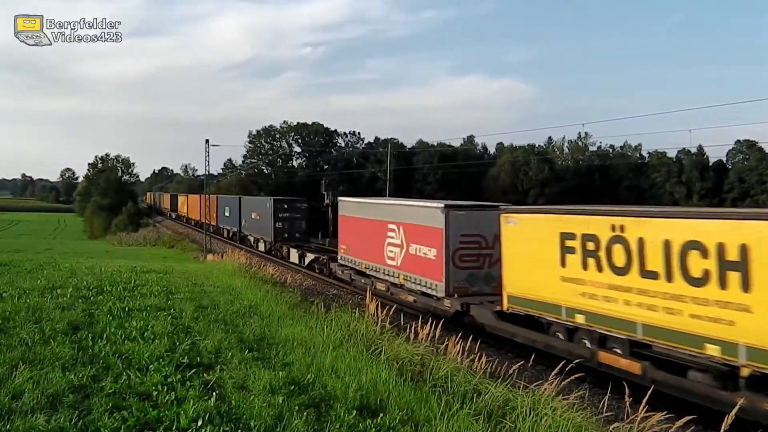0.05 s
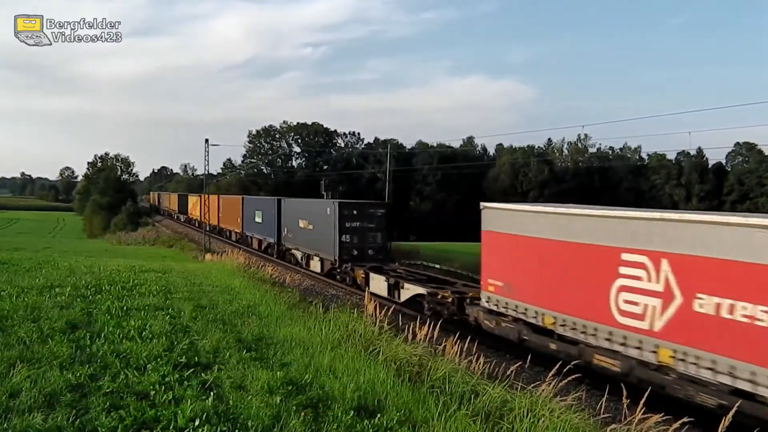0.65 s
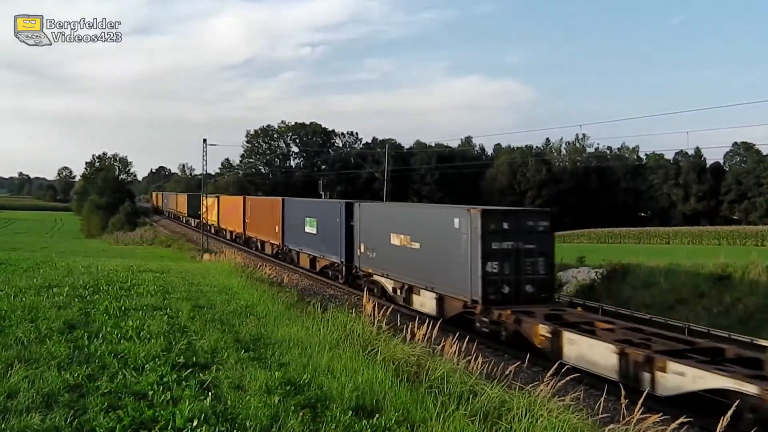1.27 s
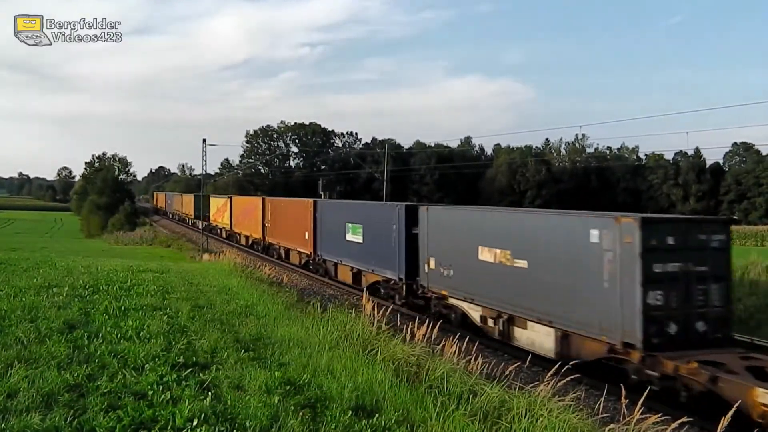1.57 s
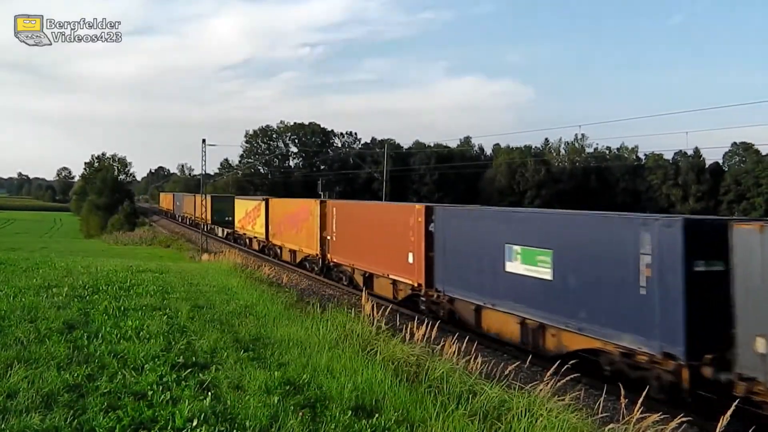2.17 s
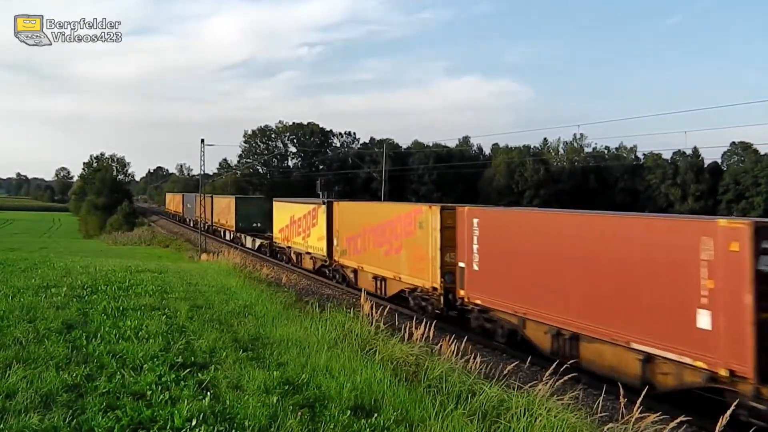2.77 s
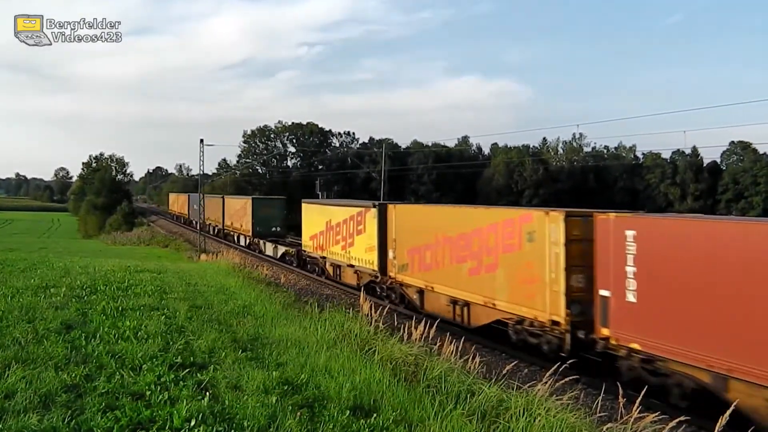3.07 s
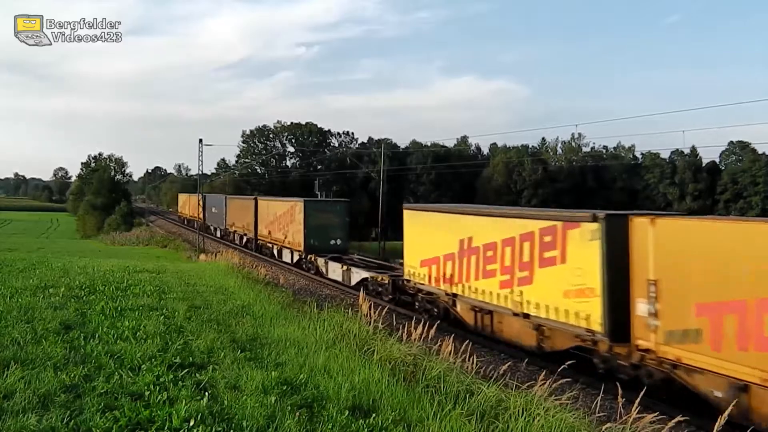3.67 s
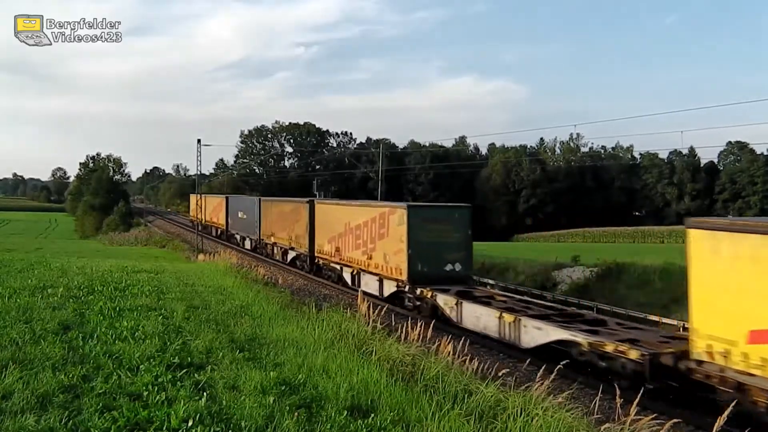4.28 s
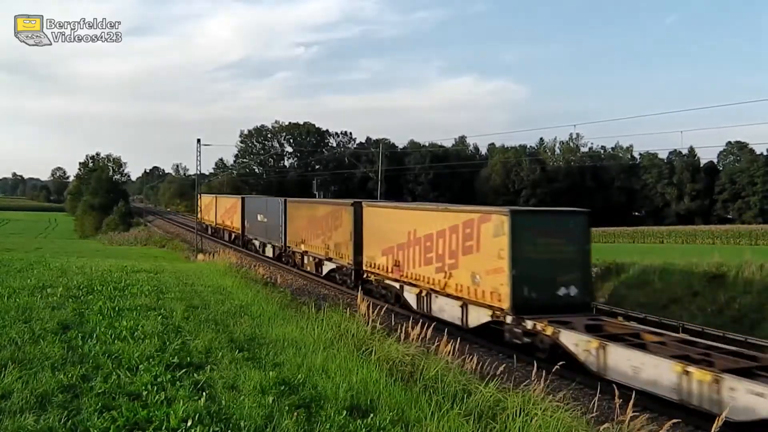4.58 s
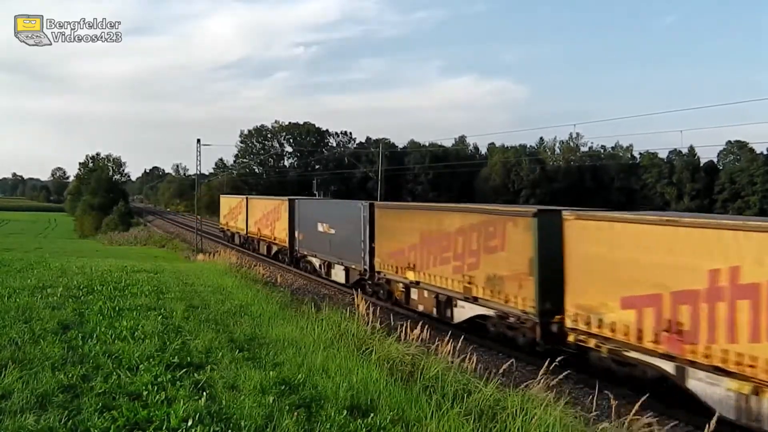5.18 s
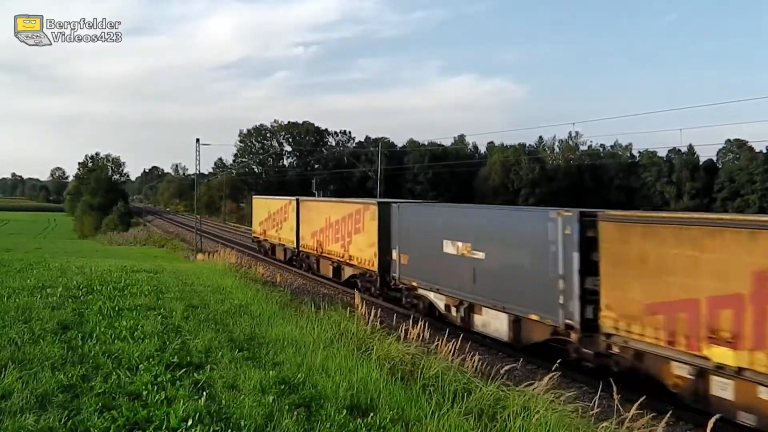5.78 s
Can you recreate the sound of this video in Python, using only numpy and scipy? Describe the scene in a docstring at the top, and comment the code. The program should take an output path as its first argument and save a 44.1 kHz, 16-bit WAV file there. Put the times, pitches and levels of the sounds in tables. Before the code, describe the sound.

A container freight train passes close at speed, its loud, throbbing roar mixed with ringing wheels, steel hiss and rattles.

```python
"""Open fields, trackside: a container train passes at speed, close to a stereo microphone pair.
Rough treads shake the rails into a roar that throbs and knocks. Two kinds of wheel ring in turn,
sinking in pitch as they go by. Above: steel-on-steel hiss, rattling fittings, two flange squeaks.
Below: thumping wagon frames, droning bodies and the rumble of bouncing axles."""
import sys
import numpy as np
from scipy import signal
from scipy.fft import rfft, irfft, next_fast_len
from scipy.io import wavfile
from scipy.ndimage import uniform_filter1d, minimum_filter1d

SR = 44100
rng = np.random.default_rng(int(sys.argv[2]) if len(sys.argv) > 2 else 0)


def inscribe(sig):
    """Save sig as 16-bit PCM at rate SR to the path in sys.argv[1].

    A 1-D sig is mono; a 2-D sig holds one channel per row.
    Samples are clipped to [-1, 1] before scaling.
    """
    pcm = np.round(np.clip(np.atleast_2d(sig).T, -1, 1) * 32767)
    wavfile.write(sys.argv[1], SR, pcm.astype(np.int16))


N = 261954
TIME = np.arange(N) / SR
HZ = np.fft.rfftfreq(N, 1 / SR)

# layer spectra: freq_hz, relative_density_db
ROAR_SPECTRUM = [(150, -44), (330, -16), (460, -6.5), (620, 0.0), (800, -0.0), (1050, 0.1), (1300, -0.2),
                 (1550, -0.7), (1800, -3.3), (2200, -9.5), (3000, -26), (6000, -55)]
RASP_SPECTRUM = [(900, -30), (1700, 1), (2050, 2.5), (2480, 2), (2800, -0.5), (3350, -2), (3900, -10.5),
                 (6000, -35)]
HISS_SPECTRUM = [(2000, -20.5), (3400, -0.5), (4200, 0.5), (4750, -0.5), (5600, 0.5), (6800, 2),
                 (7400, -7.5), (8400, -9.5), (9300, -17), (11000, -50.5)]
SIZZLE_SPECTRUM = [(7000, -19), (9200, -5.5), (10200, 1.5), (11000, 0), (12500, -10.5), (14000, -19),
                   (15500, -32)]
RUMBLE_SPECTRUM = [(8, -36), (20, -14), (35, -16), (45, -9.5), (60, -17), (90, -12.5), (200, -56)]
DRONE_SPECTRUM = [(50, -31), (85, -2.5), (115, 2.5), (180, 2), (260, -0.5), (370, -1.5), (600, -12.5),
                  (1500, -54)]
# rolling noise, before trim: time_s, level_db
ROAR_LEVELS = [(0.0, -23), (0.35, -24.5), (1.0, -23), (1.75, -20.5), (3.5, -21), (4.6, -20.5), (5.2, -23.5),
               (5.94, -21.5)]
RASP_LEVELS = [(0.0, -25.5), (0.3, -24.5), (1.05, -20.5), (1.8, -24), (3.4, -24), (4.0, -29), (4.45, -27.5),
               (4.8, -25.5), (5.55, -22), (5.94, -26.5)]
# bogie throb: centre_s, half_length_s, beat_hz, depth_db
BOGIE_THROBS = [(1.279, .3, 10.3, 1.05), (3.569, .45, 9.3, .75), (3.85, .6, 5.7, .65),
                (4.796, .45, 4.0, 1.05), (5.0, .6, 9.7, .75)]
# wheel knocks on the rail: centre_s, change_db
RAIL_KNOCKS = [(.689, 4), (.824, 3.5), (1.093, 2.5), (1.376, -1), (4.257, 2.5), (4.395, 0.5), (4.802, 2),
               (4.87, 5), (5.007, -0.2)]
# brief level dips: centre_s, change_db
LEVEL_DIPS = [(.716, -3.5), (2.343, -2), (4.46, -2.5), (4.644, -1.5), (5.139, -1.5)]
# modes of the two wheel kinds: pitch_hz, width_hz, level_db
LOW_WHEEL_MODES = [(658, 250, -27), (971, 134, -21.5), (1397, 116, -21.5), (1757, 87, -26.5),
                   (2153, 170, -24.5), (3540, 260, -32)]
HIGH_WHEEL_MODES = [(920, 330, -23), (1214, 175, -17.7), (1708, 210, -22), (2360, 250, -27.5),
                    (3320, 310, -31), (4120, 130, -35.5)]
# passing wheel sets: centre_s, half_length_s, kind, pitch_ratio, gain_db
WHEEL_PASSES = [(0.453, 0.81, "low", 0.99, 0.5), (1.13, 0.43, "low", .99, 0.2),
                (1.856, 0.67, "low", 0.96, -0.5), (2.843, 0.89, "high", 1.04, 0),
                (3.837, 0.56, "high", 1.004, 0.1), (4.575, 0.7, "high", 0.968, -2),
                (5.645, 0.65, "low", .985, 0)]
# single wheel modes singing out: centre_s, half_length_s, pitch_hz, level_db
WHEEL_PINGS = [(.52, 0.46, 942, -21), (2.17, .18, 2480, -26.5), (4.594, 0.22, 1760, -31),
               (4.785, 0.053, 2390, -25), (5.063, .14, 1640, -20), (5.146, 0.29, 1043, -22),
               (5.55, 0.43, 2032, -23.5), (5.624, 0.56, 1304, -22.5), (5.78, .35, 2216, -20.5)]
# contact treble, before trim: time_s, hiss_db, sizzle_db
CONTACT_LEVELS = [(0.0, -22, -33.0), (0.7, -21.5, -32.5), (1.36, -20.0, -34), (1.45, -22.0, -35.0),
                  (1.8, -24.5, -39.5), (2.4, -23.0, -34.5), (3.4, -22, -36.5), (3.97, -25.5, -41),
                  (4.45, -25, -39.0), (4.77, -22.5, -35.5), (4.92, -24.0, -35.5), (5.5, -19.0, -33.0),
                  (5.94, -19, -35)]
# loose fittings, before trim: centre_s, level_db
FITTING_RATTLES = [(.996, -22.5), (1.1, -19), (1.368, -19.5), (1.575, -20), (2.541, -20.5), (2.736, -20),
                   (3.688, -20), (4.784, -27), (5.41, -21.5)]
# flange squeaks: centre_s, half_length_s, pitch_hz, level_db
FLANGE_SQUEAKS = [(4.655, .04, 5480, -25), (5.04, .04, 5100, -25.5)]
# wagon frame thumps: peak_s, peak_db, pitch_hz
FRAME_THUMPS = [(.527, -13.5, 171), (.618, -14.5, 168), (1.349, -15, 247), (1.596, -16, 179),
                (1.791, -18, 168), (2.059, -18, 224), (2.615, -19.5, 190), (4.566, -21, 95),
                (5.014, -20.5, 112)]
# booming wagon bodies: centre_s, half_length_s, pitch_hz, width_hz, level_db
BODY_BOOMS = [(0.75, 0.97, 187, 55, -31.5), (1.3, 0.65, 611, 164, -22.5), (5.14, 0.95, 109, 39, -32.5),
              (5.85, 0.21, 710, 200, -22)]
# track load, before trim: time_s, rumble_db, drone_db
LOAD_LEVELS = [(0.0, -26, -25), (0.6, -27.5, -23.5), (1.1, -29, -26.0), (1.28, -39, -27),
               (2.05, -43, -25.5), (2.45, -46, -29), (2.8, -35, -27), (4.15, -39.5, -27.5),
               (4.55, -32, -24.5), (5.55, -31.5, -27.5), (5.94, -36, -28.5)]
# microphone balance: freq_hz, left_minus_right_db
MIC_BALANCE = [(50, 1), (300, 0.4), (1200, -1), (2000, -1.5), (3100, -.7), (4800, -5.5), (6700, -8.5),
               (8600, -7), (10200, -1.5), (12000, -4.5), (15000, -1.5)]
# microphone phase: freq_hz, left_lead_rad
MIC_PHASE = [(100, -.11), (900, -.2), (1450, -.34), (1900, -.22), (2800, -.22), (4100, -.9), (5700, -.85),
             (6200, -1.25), (6600, -.4), (7300, -1.6), (8100, -3.2), (9800, -4.4), (10800, -5.3),
             (13000, -4.3)]
# left-right likeness: freq_hz, coherence
MIC_COHERENCE = [(500, 1), (1200, 0.98), (2600, 0.94), (4000, 0.87), (5900, 0.59), (6400, 0.39), (7200, .6),
                 (8000, 0.39), (10000, 0.87), (11500, .3), (15000, .2)]


def rolling(roar_trim_db=7.5, rasp_trim_db=4.5, flutter_db=1.12):
    """Rough treads shake the rails into a roar, with a grainy rasp above it."""
    roar_db, = along(ROAR_LEVELS)
    rasp_db, = along(RASP_LEVELS)
    roar = coloured(ROAR_SPECTRUM)
    rasp = coloured(RASP_SPECTRUM, impacts(per_s=17000, spread_db=1.5))
    rasp = patchy(rasp, depth_db=2.06, patch_hz=200, patch_s=0.061)
    roar *= from_db(roar_db + roar_trim_db + flutter_db * flutter(44))
    return roar + rasp * from_db(rasp_db + rasp_trim_db)


def throb(jitter_db=0.6, knock_half_s=0.0077, dip_half_s=0.018):
    """Gain in dB: even beats of passing bogies, wheel knocks, brief dips, random jitter."""
    beats = sum(db * bell(TIME, centre_s, half_s) * np.cos(2 * np.pi * beat_hz * (TIME - centre_s))
                for centre_s, half_s, beat_hz, db in BOGIE_THROBS)
    knocks = sum(db * bell(TIME, centre_s, knock_half_s) for centre_s, db in RAIL_KNOCKS)
    dips = sum(db * bell(TIME, centre_s, dip_half_s) for centre_s, db in LEVEL_DIPS)
    jitter = flutter(22)
    drift = uniform_filter1d(jitter, size=SR // 6)
    return beats + knocks + dips + jitter_db * unit(jitter - drift)


def wheels(doppler_per_s=0.024, pulse_db=0.46):
    """Wheel sets ring in turn; rough spots on the tread make each mode pulse irregularly."""
    modes = {"low": LOW_WHEEL_MODES, "high": HIGH_WHEEL_MODES}
    out = np.zeros((2, N))
    for centre_s, half_s, kind, pitch_ratio, pass_db in WHEEL_PASSES:
        for hz, width_hz, mode_db in modes[kind]:
            gain = from_db(pass_db + mode_db + pulse_db * flutter(24))
            out += gain * ring(centre_s, half_s, hz * pitch_ratio, width_hz, doppler_per_s)
    return out


def wheel_pings(width_hz=70, doppler_per_s=0.014):
    """Single wheel modes stand out as narrower tones."""
    return sum(from_db(db) * ring(centre_s, half_s, hz, width_hz, doppler_per_s)
               for centre_s, half_s, hz, db in WHEEL_PINGS)


def contact_hiss(hiss_trim_db=1.67, hiss_flutter_db=0.5, sizzle_flutter_db=0.3):
    """Wheel-rail contact patches hiss, with a fine sizzle on top."""
    hiss_db, sizzle_db = along(CONTACT_LEVELS)
    hiss = patchy(coloured(HISS_SPECTRUM), depth_db=1.2, patch_hz=350, patch_s=0.023)
    sizzle = coloured(SIZZLE_SPECTRUM, impacts(per_s=25000, spread_db=2.5))
    sizzle = patchy(sizzle, depth_db=1.1, patch_hz=400, patch_s=0.036)
    hiss *= from_db(hiss_db + hiss_trim_db + hiss_flutter_db * flutter(54))
    sizzle *= from_db(sizzle_db + sizzle_flutter_db * flutter(25))
    return hiss + sizzle


def rattles(trim_db=3.0, half_s=0.017, sizzle_gain=0.22):
    """Loose fittings shed short showers of metal clicks."""
    clicks = impacts(per_s=5000, spread_db=4.0)
    metal = coloured(HISS_SPECTRUM, clicks) + coloured(RASP_SPECTRUM, clicks)
    metal += sizzle_gain * coloured(SIZZLE_SPECTRUM, clicks)
    bursts = sum(from_db(db + trim_db) * bell(TIME, centre_s, half_s) for centre_s, db in FITTING_RATTLES)
    return unit(metal) * bursts


def squeaks(width_hz=130, sink_per_s=0.7, octave_db=-18):
    """A flange grazes the rail: a brief falling whistle and its fainter octave."""
    out = np.zeros((2, N))
    for centre_s, half_s, hz, db in FLANGE_SQUEAKS:
        whistle = ring(centre_s, half_s, hz, width_hz, sink_per_s)
        octave = ring(centre_s, half_s, 2 * hz, 2 * width_hz, sink_per_s)
        out += from_db(db) * (whistle + from_db(octave_db) * octave)
    return out


def thumps(rise_s=0.012):
    """Each jolt rings a wagon frame for a few cycles."""
    out = np.zeros(N)
    for peak_s, db, hz in FRAME_THUMPS:
        age = np.clip((TIME - peak_s) / rise_s + 1, 0, 20)
        envelope = (age * np.exp(1 - age)) ** 2
        out += from_db(db) * envelope * np.sin(2 * np.pi * (hz * TIME + rng.random()))
    return out


def rumble(ground_trim_db=1.5, drone_trim_db=-1, doppler_per_s=0.0094):
    """Axles bounce on the track; wagons drone, some booming at their own pitch."""
    ground_db, drone_db = along(LOAD_LEVELS)
    booms = sum(from_db(db) * ring(centre_s, half_s, hz, width_hz, doppler_per_s)
                for centre_s, half_s, hz, width_hz, db in BODY_BOOMS)
    ground = coloured(RUMBLE_SPECTRUM) * from_db(ground_db + ground_trim_db)
    drone = coloured(DRONE_SPECTRUM) * from_db(drone_db + drone_trim_db)
    return ground + drone + booms


def microphones(x):
    """Two close ports: bass alike, treble apart in level, phase and detail."""
    common, independent = rfft(x)
    coherence = np.clip(across(MIC_COHERENCE), 0, 1)
    lean = from_db(across(MIC_BALANCE)) * np.exp(1j * across(MIC_PHASE))
    left = lean * (coherence * common + np.sqrt(1 - coherence ** 2) * independent)
    mid_gain = np.sqrt(1 + abs(lean) ** 2 + 2 * coherence * lean.real) / 2
    return irfft(np.array([left, common]) / mid_gain, N)


def ring(centre_s, half_s, hz, width_hz, sink_per_s):
    """Roughness-driven resonance; swells, fades and sinks in pitch as it passes."""
    near = abs(TIME - centre_s) < 2 * half_s
    t = TIME[near]
    roughness = rng.standard_normal((2, N))[:, near]
    pitch_hz = hz * (1 - sink_per_s * (t - centre_s))
    carrier = np.exp(2j * np.pi * np.cumsum(pitch_hz) / SR)
    pole = np.exp(-np.pi * width_hz / SR)
    baseband = signal.lfilter([1], [1, -2 * pole, pole * pole], roughness / carrier)
    out = np.zeros((2, N))
    out[:, near] = unit((carrier * baseband).real) * bell(t, centre_s, half_s)
    return out


def impacts(per_s, spread_db):
    """Tiny random steel-on-steel knocks, a few of them large."""
    size = from_db(spread_db * np.minimum(rng.exponential(1, (2, N)), 4))
    return size * rng.standard_normal((2, N)) * (rng.random((2, N)) < per_s / SR)


def coloured(spectrum, drive=None):
    """Two independent noises, or a given drive, through a spectrum; rms 1."""
    drive = rng.standard_normal((2, N)) if drive is None else drive
    size = next_fast_len(N)
    gain = np.interp(np.fft.rfftfreq(size, 1 / SR), HZ, from_db(across(spectrum)))
    return unit(irfft(rfft(drive, size) * gain, size)[:, :N])


def patchy(x, depth_db, patch_hz, patch_s):
    """Narrow bands swell and fade independently; rms 1."""
    frames = signal.stft(x, nperseg=512)[2]
    noise = rng.standard_normal(frames.shape[1:])
    lag_s = np.fft.fftfreq(noise.shape[0], SR / 512)[:, None]
    rate_hz = np.fft.rfftfreq(noise.shape[1], 256 / SR)
    smoothing = bell(lag_s * patch_hz, 0, 0.7) * bell(rate_hz * patch_s, 0, 0.4)
    patches = unit(np.fft.irfft2(np.fft.rfft2(noise) * smoothing, noise.shape))
    return unit(signal.istft(frames * from_db(depth_db * patches), nperseg=512)[1][:, :N])


def flutter(rate_hz):
    """Random wander up to about rate_hz; rms near 1."""
    hz = np.fft.rfftfreq(2048, N / SR / 2048)
    slow = irfft(rfft(rng.standard_normal(size=2048)) / (1 + (hz / rate_hz) ** 2))
    return np.interp(TIME, np.linspace(0, N / SR, len(slow)), unit(slow))


def across(points):
    """Frequency table at every bin, on a log axis."""
    hz, value = np.transpose(points)
    return np.interp(np.log(HZ + 1), np.log(hz + 1), value)


def along(rows):
    """Time table at every sample, one curve per value column."""
    time_s, *columns = np.transpose(rows)
    return [np.interp(TIME, time_s, column) for column in columns]


def bell(t, centre, half):
    """Gaussian of height 1; 1/e at centre +/- half."""
    return np.exp(-np.minimum(((t - centre) / half) ** 2, 100))


def from_db(db):
    """Decibels to gain."""
    return 10 ** (np.asarray(db) / 20)


def unit(x):
    """Scales to rms 1."""
    return x / np.sqrt(np.mean(x ** 2) + 1e-20)


def scene(hiss_throb_share=0.78):
    """Roar, wheel tones and hiss throb together; the other layers add unmodulated."""
    throb_db = throb()
    wheel_noise = (rolling() + wheels() + wheel_pings()) * from_db(throb_db)
    treble = contact_hiss() * from_db(hiss_throb_share * throb_db) + rattles() + squeaks()
    return microphones(wheel_noise + treble + rumble() + thumps())


def record(dry, ceiling=1.0, notch_hz=7850, notch_width_hz=600, cutoff_hz=15750):
    """Fast peak limiter, narrow treble notch, low-pass."""
    gain = ceiling / np.maximum(abs(dry), ceiling)
    limited = dry * uniform_filter1d(minimum_filter1d(gain, size=9), size=9)
    notched = signal.lfilter(*signal.iirnotch(notch_hz, notch_hz / notch_width_hz, SR), limited)
    lowpass = signal.firwin(1023, cutoff_hz, window=("kaiser", 9), fs=SR)
    return signal.oaconvolve(notched, lowpass[None], "same")


dry = scene()
out = record(dry)
inscribe(out)
```